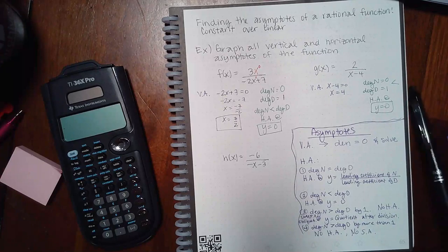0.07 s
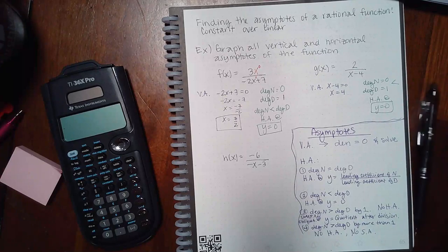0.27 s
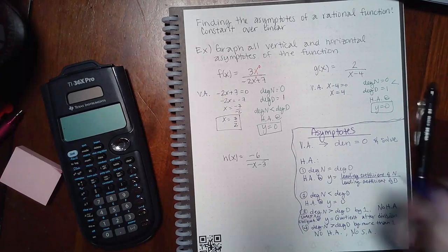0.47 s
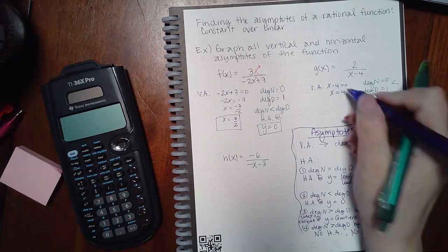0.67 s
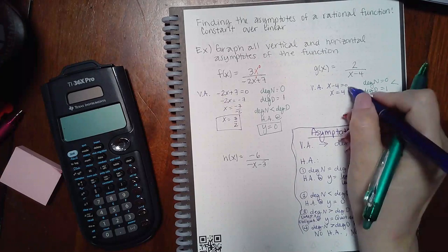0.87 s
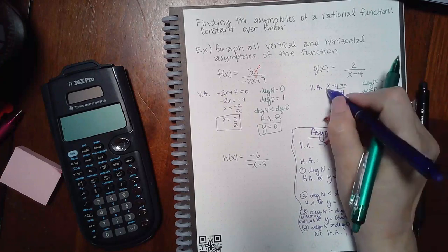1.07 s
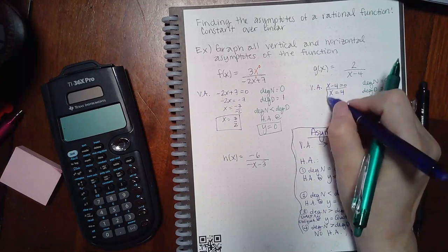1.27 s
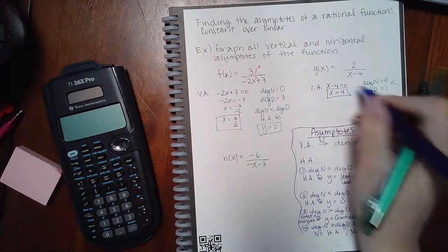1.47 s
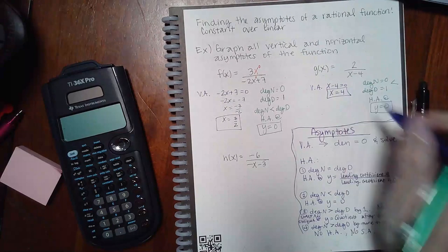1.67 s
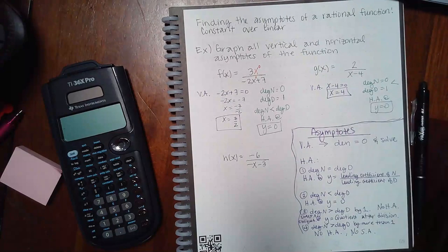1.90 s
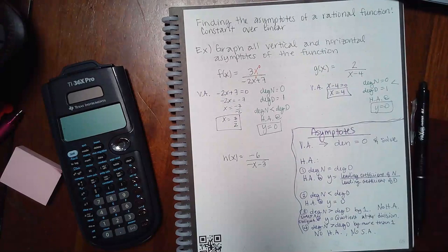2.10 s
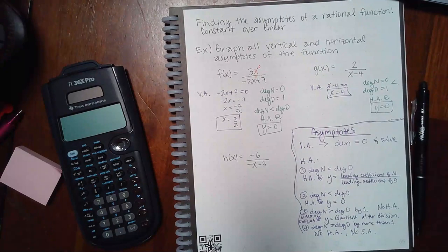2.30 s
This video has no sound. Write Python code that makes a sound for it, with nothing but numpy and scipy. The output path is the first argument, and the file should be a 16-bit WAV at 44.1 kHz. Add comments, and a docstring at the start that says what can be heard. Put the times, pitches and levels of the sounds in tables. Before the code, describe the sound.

Two sharp clicks of a pen set on a wooden desk, followed by lighter pen ticks.

```python
"""A sharp click and a wooden knock, then a second, thinner click: a plastic pen is put down on a desk.
Each impact sets the modes of pen and desk ringing, and a small quiet room reverberates briefly.
Pens held in the hand tick against each other, and a felt tip rubs four short strokes on a notebook.
Friction makes the pens rustle and squeak faintly in the fingers.
Under it all lie a low hum and faint room noise."""
import sys
import numpy as np
from scipy import signal
from scipy.fft import rfft, irfft, next_fast_len
from scipy.io import wavfile
from scipy.ndimage import map_coordinates

SR = 44100
rng = np.random.default_rng(int(sys.argv[2]) if len(sys.argv) > 2 else 0)


def waveform_to_disk(signal):
    """Save audio, clipped to [-1, 1], as 16-bit WAV at the path in sys.argv[1]."""
    frames = np.transpose(np.atleast_2d(signal))
    scaled = np.clip(frames, -1, 1) * 32767
    samples = np.round(scaled).astype(np.int16)
    wavfile.write(sys.argv[1], SR, samples)


N = 103458
T = np.arange(SR // 2) / SR  # seconds within one contact
CLOCK = np.arange(N) / SR  # seconds within the scene
LIGHT_RISE_S = 0.0005  # attack of a light plastic contact

# click spectra of the first and the second blow, each: frequency_hz, level_db
CLICK_SPECTRA = [
    [(400, -31), (2000, -17), (3400, -17.5), (4900, -13.5), (5650, -9), (6400, -11.5), (7500, -5),
     (10200, -0.5), (15500, -7.5)],
    [(400, -25.5), (1200, -26), (2200, -14.5), (3300, -19.5), (4600, -9), (5400, -11.5), (6500, -7),
     (7700, -3.5), (9200, 2), (12600, -5), (15500, -3.5)],
]


def amp(db):
    """Amplitude ratio of a level in decibels."""
    return 10 ** (np.asarray(db) / 20)


def unit_rms(x):
    """Normalisation to an rms of 1."""
    return x / np.sqrt(np.mean(x ** 2) + 1e-20)


def curve_at(points, hz):
    """Interpolation of (frequency, value) points on a logarithmic frequency axis."""
    frequencies, values = np.transpose(points)
    return np.interp(np.log(hz + 1), np.log(frequencies + 1), values)


def noise(spectrum, size, tilt_db=0):
    """Spectral shaping of white noise to rms 1, with a tilt per octave above 1 kHz."""
    hz = np.fft.rfftfreq(size, 1 / SR)
    gain = amp(curve_at(spectrum, hz) + tilt_db * np.log2(np.maximum(hz, 1000)))
    return unit_rms(irfft(rfft(rng.standard_normal(size)) * gain, size))


def wobble(rate_hz):
    """Smooth random modulation: a spline through rate_hz random values a second."""
    return map_coordinates(rng.standard_normal(int(N * rate_hz / SR) + 4), [CLOCK * rate_hz])


def add(track, start_s, sound):
    """Superposition of a sound on the track, cut to the track's ends."""
    start = round(start_s * SR)
    sound, start = sound[max(-start, 0):], max(start, 0)
    track[start:start + len(sound)] += sound[:N - start]


def strike(rise_s, t60_s):
    """Impact envelope: a quadratic rise, then the exponential decay of a damped vibration."""
    rise = np.minimum((T + rise_s / 2) / (1.5 * rise_s), 1) ** 2
    return rise * amp(-60 * np.maximum(T - rise_s, 0) / t60_s)


def swell(middle_s, length_s):
    """Gaussian envelope of one movement of the hand."""
    return np.exp(-(2 * (CLOCK - middle_s) / length_s) ** 2)


def ring(modes, rise_s=0.00088):
    """Free vibration: a sum of damped modes whose levels and phases vary with each contact."""
    hz, db, t60_s = np.transpose(modes)[:, :, None]
    envelopes = amp(db + 2 * rng.standard_normal(hz.shape)) * strike(rise_s, t60_s)
    return (envelopes * np.sin(2 * np.pi * (hz * T + rng.random(hz.shape)))).sum(0)


def in_room(sound, wet_db, build_s=0.0036):
    """Reverberation: the direct sound plus its convolution with a tail whose treble dies first."""
    # decay of the room: frequency_hz, t60_s
    decay_times = [(200, 0.42), (1400, 0.43), (4000, 0.38), (9000, 0.32), (15000, 0.25)]
    # spectrum of the tail: frequency_hz, level_db
    colour = [(100, -4.5), (2000, 3), (5000, 4), (9000, 1.5), (15000, -4)]
    hz, t, bands = signal.stft(rng.standard_normal(len(T)), SR, nperseg=256)
    bands = bands * amp(curve_at(colour, hz)[:, None] - 60 * t / curve_at(decay_times, hz)[:, None])
    tail = signal.istft(bands, SR, nperseg=256)[1][:len(T)]
    tail *= 1 - np.exp(-(T / build_s) ** 2)
    return sound + amp(wet_db) * signal.fftconvolve(sound, tail / np.linalg.norm(tail))[:len(T)]


def blow(spectrum, pen_modes, click_db, knock_db, rise_s, t60_s, ring_db, room_db):
    """An impact excites both bodies: the hard plastic cracks and rings, the desk top knocks."""
    # spectrum of the knock: frequency_hz, level_db
    thud = [(60, -23.5), (110, -4), (200, 1.5), (330, -5.5), (470, -6.5), (650, -4.5), (1150, -10),
            (1700, -6.5), (3000, -9.5), (6000, -20.5)]
    # modes of the desk: pitch_hz, level_db, t60_s
    desk_modes = [(173, -3, .14), (231.6, -6, 0.12), (660, -3.5, 0.069), (1110, -9.5, 0.27),
                  (1199, -14, .3), (1640, -4.5, 0.242), (1860, -10.5, .2), (2078, -12.5, 0.24),
                  (2420, -0.5, 0.25)]
    click = noise(spectrum, len(T)) * strike(rise_s, t60_s) + amp(ring_db) * ring(pen_modes, rise_s)
    knock = noise(thud, len(T)) * strike(rise_s, t60_s=0.28) + amp(-6) * ring(desk_modes)
    return amp(click_db) * in_room(click, room_db) + amp(knock_db) * in_room(knock, wet_db=-8.5)


def pen_on_desk():
    """A touch and two blows; the point of impact decides how strongly each mode is excited."""
    # the pen meets the desk: start_s, click_db, knock_db, rise_s, t60_s, ring_db, room_db
    blows = [(0.023, -3.5, -31.5, 0.0023, 0.0088, -12.5, -8), (0.2630, -6.5, -61, 0.0012, 0.038, -7, -12.5)]
    # the first touch, already dying away at time zero: same columns
    touch = (-.018, -10, -35, .001, .015, -12, -7.5)
    # modes of barrel and clip: pitch_hz, first_blow_db, second_blow_db, t60_s
    modes = [(4140, -13.5, -24, 0.022), (5497, -6, -25.5, 0.017), (6110, -9.5, -1, 0.013),
             (7560, -1.5, -14.5, .02), (8100, -11, -6, .03), (8830, -10, -1.5, .02),
             (9310, -17.5, -2.5, 0.064), (10070, -1.5, -3.5, .012), (10680, -5, -4.5, .018),
             (11680, 3.5, -5, 0.013), (13430, 3, -16, .012), (13960, -2, -1.5, .016)]
    first = CLICK_SPECTRA[0], [(hz, db, t60_s) for hz, db, _, t60_s in modes]
    second = CLICK_SPECTRA[1], [(hz, db, t60_s) for hz, _, db, t60_s in modes]
    track = np.zeros(N)
    for spot, (start_s, *impact) in zip([first, first, second], [touch, *blows]):
        add(track, start_s, blow(*spot, *impact))
    return track


def chatter():
    """Secondary impacts: barrel and clip rattle after each blow in short bursts of noise."""
    # contacts of barrel and clip: start_s, level_db
    contacts = [(0.028, -19.5), (0.0338, -15), (.0365, -17), (0.2687, -27), (0.2716, -17), (0.274, -17),
                (0.2805, -32), (0.3037, -20)]
    track = np.zeros(N)
    for start_s, level_db in contacts:
        burst = noise(CLICK_SPECTRA[1], len(T)) * strike(LIGHT_RISE_S, t60_s=0.018)
        add(track, start_s, amp(level_db) * in_room(burst, wet_db=-9))
    return track


def background(hum_hz=29.9, drift_rad=0.41, noise_db=-52.5):
    """A low hum wavers by phase and amplitude modulation over steady room noise."""
    # course of the hum: time_s, level_db
    hum_levels = [(0.0, -48), (0.19, -41.5), (0.24, -46.5), (0.7, -41.5), (1.12, -48.5), (1.2, -44),
                  (2.19, -43.5), (2.34, -43.5)]
    # spectrum of the room noise: frequency_hz, level_db
    air = [(20, -12), (40, -10), (63, -17), (90, -23), (130, -20), (160, -27), (250, -17), (320, -23),
           (410, -28), (510, -27), (600, -32), (720, -28), (850, -34), (1500, -37), (2200, -43.5),
           (5000, -45.5), (9500, -44.5), (12000, -49.5), (15500, -52)]
    hum = np.sqrt(2) * np.sin(2 * np.pi * hum_hz * CLOCK + drift_rad * wobble(2.237))
    hum_db = np.interp(CLOCK, *np.transpose(hum_levels))
    return amp(hum_db) * hum + amp(noise_db) * noise(air, N)


def pen_ticks(barrel_db=-19, detune=0.03):
    """Light impacts between held pens: a crack, a ping of the struck spot and the barrels' modes."""
    # contacts: start_s, peak_db, spot_hz, spot_db, tilt_db_per_octave, crack_t60_s
    ticks = [(0.4611, -43.5, 13600, -6, -3.5, 0.017), (0.882, -42, 9600, -1, 1, 0.015),
             (0.9472, -34, 9850, 2, -5, 0.0093), (0.976, -35.5, 4940, -4, -2, 0.012),
             (1.056, -39, 7800, -11, -3.5, 0.021), (1.3385, -28, 4800, -7, 1, 0.0087),
             (1.4201, -23, 5020, -1, 3.5, 0.014), (1.474, -37, 9270, -8, 1.5, 0.015),
             (1.5489, -19.5, 7190, 0, 7.5, 0.053), (1.56, -32, 7800, -16, 5, 0.03),
             (1.598, -30.5, 11700, -5, 11, 0.021), (1.6702, -23, 9100, -20, 6, 0.017),
             (1.6884, -31, 4860, -10, 8, 0.01), (1.7136, -16.5, 9500, -10, 9, 0.02),
             (1.7177, -17, 7520, -1, 4.5, 0.023), (1.7244, -21, 4820, -7, 0.5, 0.022),
             (1.728, -22, 9300, -7, 8, 0.022), (1.756, -32, 9400, 6, 2, 0.012),
             (1.7832, -24, 9470, 1, 8, 0.015), (1.8004, -22, 9520, 3, 10, 0.027),
             (1.9276, -36, 6050, -3, -1, 0.0098), (2.0635, -35, 5030, 2, 13, 0.009),
             (2.2979, -31.5, 8900, 0, 13.5, 0.037)]
    # spectrum of the crack: frequency_hz, level_db
    spectrum = [(590, -51), (1000, -14.5), (2940, -12), (4490, -10.5), (4920, -7), (6260, -7), (7440, -5),
                (9250, 0), (11600, -10.5), (15500, -16)]
    # modes of the held barrels: pitch_hz, level_db, t60_s
    barrel_modes = [(3877, -12.5, 0.27), (4800, -1.5, 0.075), (5900, -5.5, 0.11), (7630, -5.5, 0.042),
                    (9600, 1, 0.064), (10810, 0, 0.078), (13170, 5, 0.044)]
    spot_t60_s = 0.014
    track = np.zeros(N)
    for start_s, peak_db, spot_hz, spot_db, tilt_db, t60_s in ticks:
        crack = noise(spectrum, len(T), tilt_db) * strike(LIGHT_RISE_S, t60_s)
        grip = [1 + detune * rng.standard_normal(), 1, 1]  # the fingers detune the barrels
        ping = ring([(spot_hz, spot_db, spot_t60_s)])
        tick = crack + ping + amp(barrel_db) * ring(np.multiply(barrel_modes, grip))
        add(track, start_s, amp(peak_db) * in_room(tick / np.abs(tick).max(), wet_db=-12))
    return track


def felt_strokes(grain_db=3, fibre_db=4):
    """Friction noise of a felt tip on paper fibres: a dull rub in the notebook and a grainy hiss."""
    # strokes of the tip: middle_s, length_s, rub_db, hiss_db
    strokes = [(0.83, 0.078, -49, -56.5), (0.97, 0.073, -54, -55.5), (1.108, 0.081, -49.5, -54),
               (1.23, 0.059, -53.5, -57.5)]
    # spectrum of the rub: frequency_hz, level_db
    notebook = [(150, -4.5), (350, -7.5), (490, -3), (720, -3), (880, -17), (1100, -20), (1450, -13.5),
                (2200, -31), (5000, -31)]
    # spectrum of the hiss: frequency_hz, level_db
    paper = [(800, -35), (2000, -5), (4200, -6), (4900, 1), (5800, -3.5), (8500, -2.5), (9600, -1.5),
             (12000, -4.5), (15500, -14)]
    rub = noise(notebook, N) * unit_rms(amp(grain_db * wobble(150)))
    hiss = noise(paper, N) * unit_rms(amp(fibre_db * wobble(590)))
    return sum(swell(middle_s, length_s) * (amp(rub_db) * rub + amp(hiss_db) * hiss)
               for middle_s, length_s, rub_db, hiss_db in strokes)


def pen_rustle(grain_db=3):
    """Sliding friction: grainy noise swells as the pens shift in the hand."""
    # slides of the pens: middle_s, length_s, level_db
    slides = [(1.42, 0.061, -63.5), (1.675, 0.077, -54.5), (1.804, 0.9, -56)]
    # spectrum of the rustle: frequency_hz, level_db
    spectrum = [(700, -11), (1600, -0.5), (3650, -1), (3850, -1), (4200, 2.5), (5000, -1), (5450, -4),
                (5950, -2), (6600, 0.5), (7500, -2), (11000, -2.5), (13000, -6.5), (15500, -1.5)]
    envelope = sum(amp(db) * swell(middle_s, length_s) for middle_s, length_s, db in slides)
    return envelope * unit_rms(noise(spectrum, N) * amp(grain_db * wobble(250)))


def pen_squeak(level_db=-55):
    """Friction under the fingers: noise gathered in narrow spectral peaks is heard as a squeak."""
    # spectrum of the squeak: frequency_hz, level_db
    spectrum = [(800, -42), (1080, -11), (1200, 2.5), (1400, -10), (2050, -25), (2420, 9), (2750, -23),
                (3400, -18), (3850, 3), (4400, 2), (8000, -33)]
    return amp(level_db) * swell(middle_s=1.64, length_s=0.1) * noise(spectrum, N)


def scene():
    """Superposition of all sources at one point above the desk."""
    mix = pen_on_desk() + chatter() + background()
    mix += pen_ticks() + felt_strokes() + pen_rustle() + pen_squeak()
    return mix[None]


def record(dry):
    """Clipping at full scale, then band limiting by a steep low-pass."""
    cutoff_hz = 15900
    size = next_fast_len(N + SR // 2)
    hz = np.fft.rfftfreq(size, 1 / SR)
    spectrum = rfft(np.clip(dry, -1, 1), size)
    return irfft(spectrum / (1 + (hz / cutoff_hz) ** 160), size)[:, :N]


dry = scene()
out = record(dry)
waveform_to_disk(out)
```